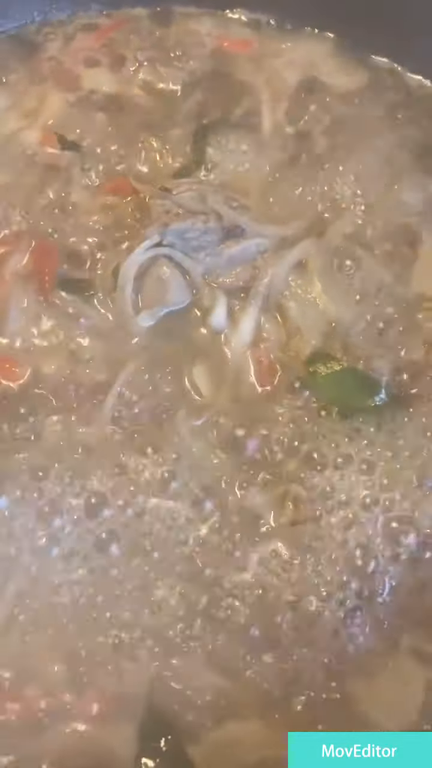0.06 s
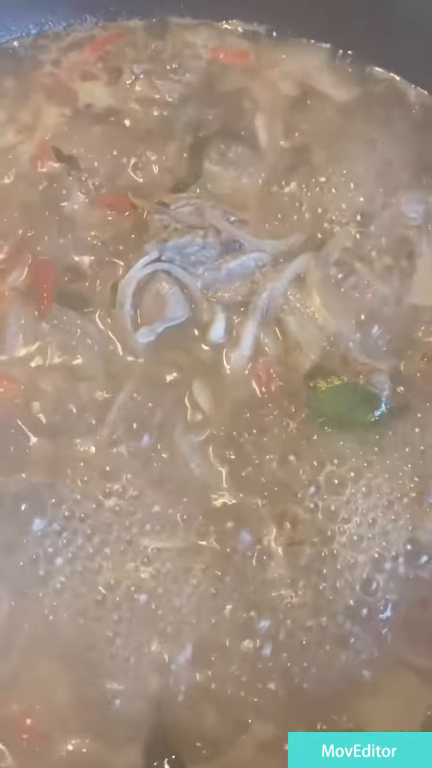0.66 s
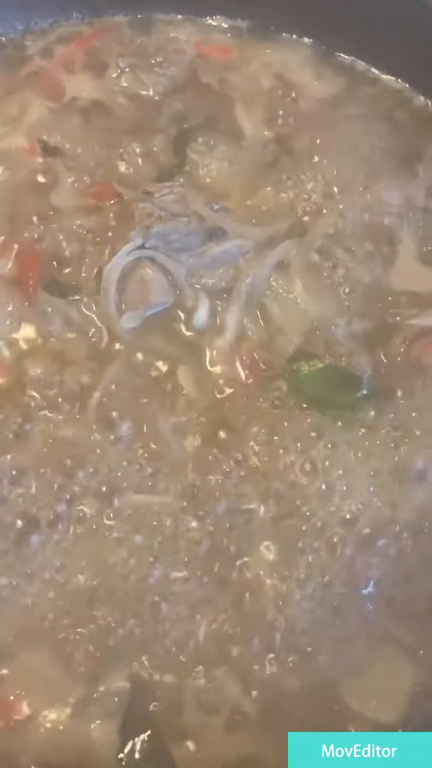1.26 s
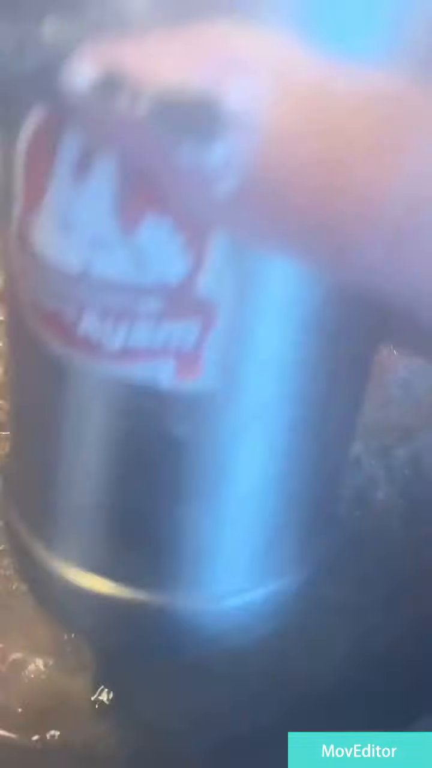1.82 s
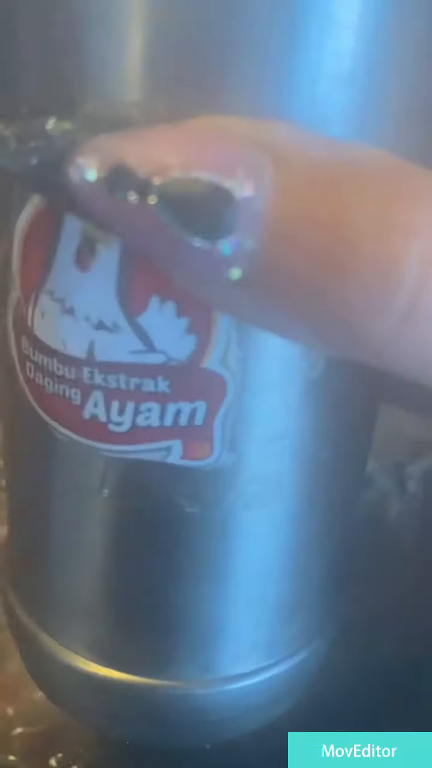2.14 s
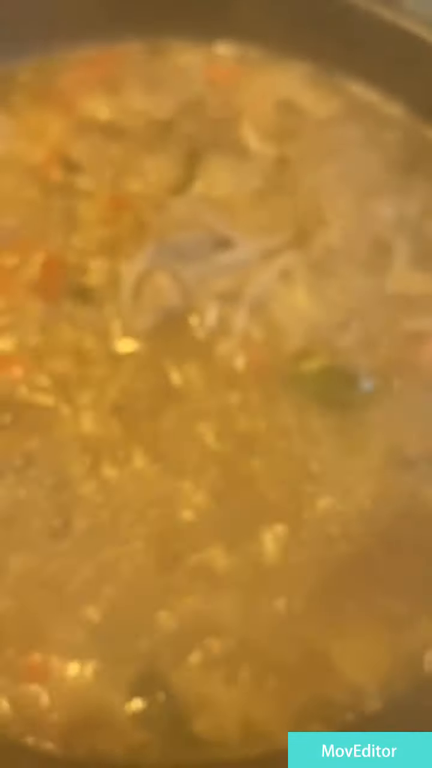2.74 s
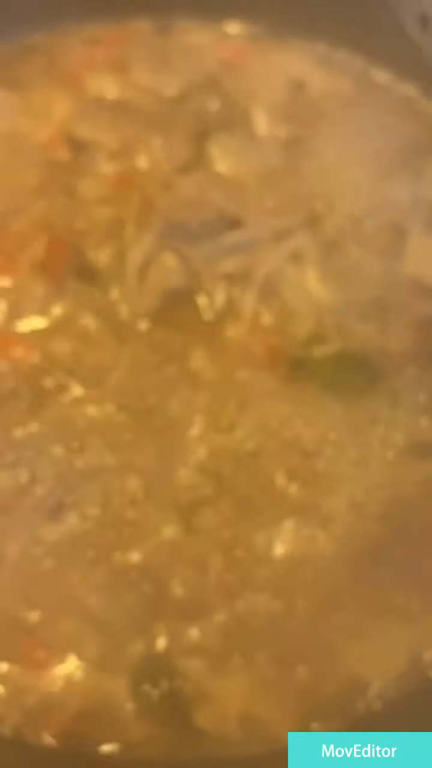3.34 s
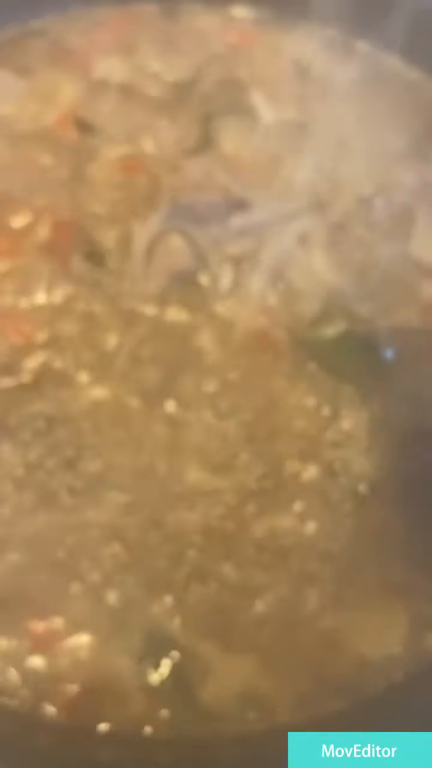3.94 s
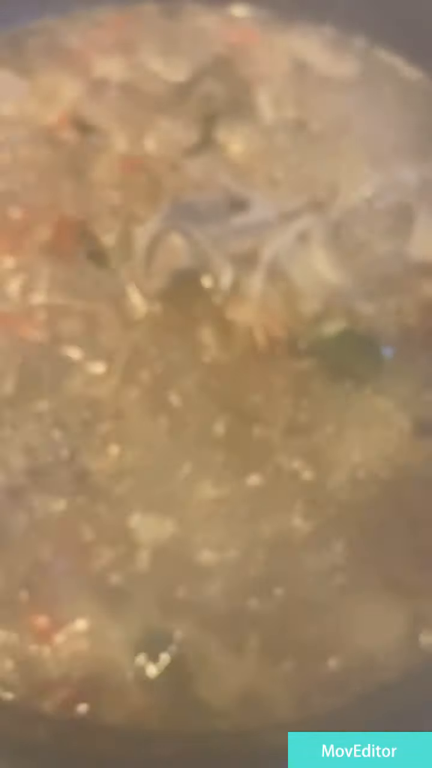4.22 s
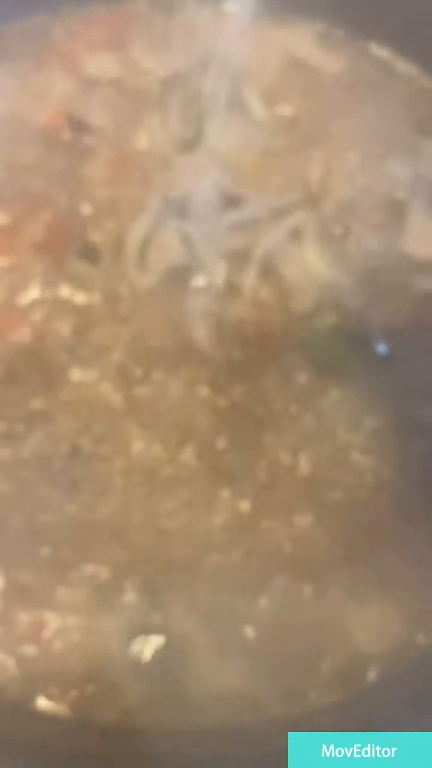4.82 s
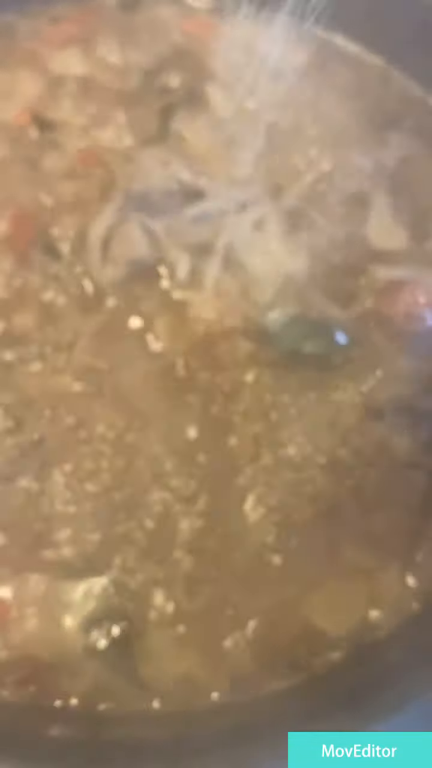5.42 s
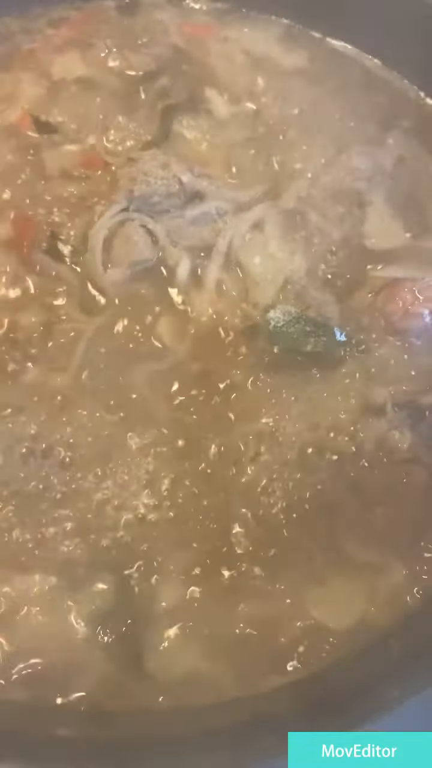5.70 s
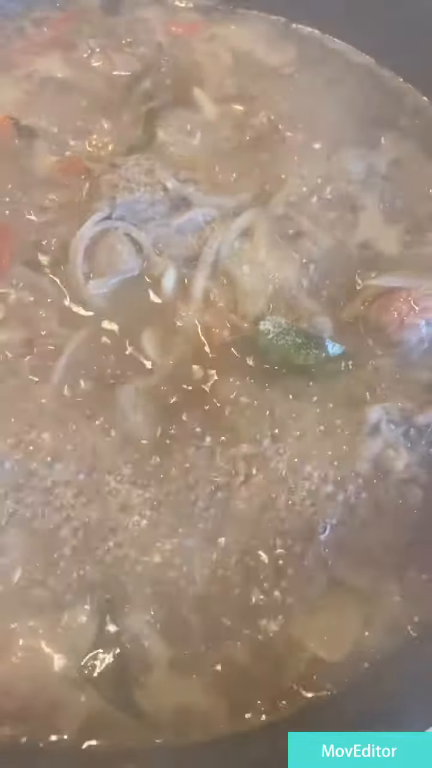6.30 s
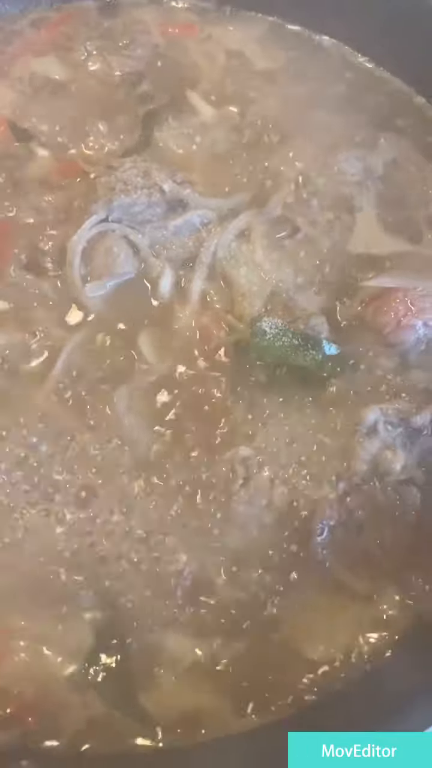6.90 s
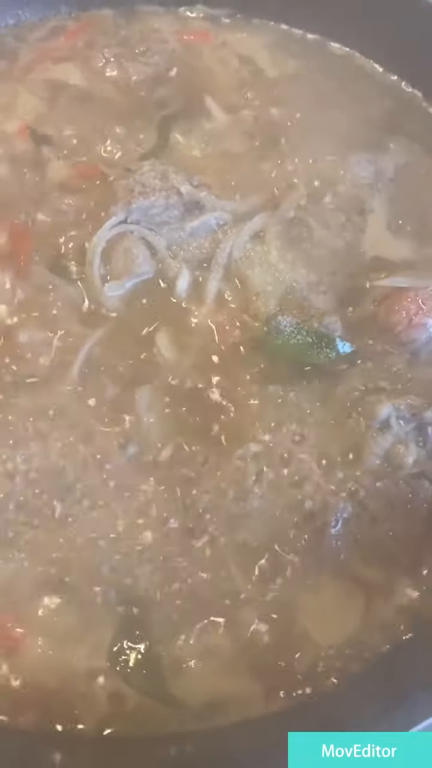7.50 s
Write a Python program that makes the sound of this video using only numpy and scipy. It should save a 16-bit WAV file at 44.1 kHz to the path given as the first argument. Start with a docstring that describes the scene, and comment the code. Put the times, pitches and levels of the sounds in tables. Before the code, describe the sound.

Close to a pan in a small kitchen, thick stew bubbles steadily with a deep churning rumble, small dry pops and fizzing foam, the pan wall ringing faintly. Around the middle, seasoning lands with two short, soft hisses. Then a plastic utensil knocks loudly on the pan once, slightly to the right, and clicks and taps lightly several times over the continuing boil.

```python
"""A thick stew boils hard in a pan, close up. Vapour heaves under the food and shakes the pan into a
rumble; bubbles crackle and pop on top and ring its wall; fine foam fizzes, hissing up twice as
seasoning falls in. Late on, a plastic utensil knocks once, hard, then clicks and taps lightly
against the pan. A small kitchen answers the pops and the utensil."""
import sys
import numpy as np
from scipy import signal
from scipy.fft import rfft, irfft, next_fast_len
from scipy.io import wavfile
from scipy.ndimage import uniform_filter1d, map_coordinates

SR = 44100
rng = np.random.default_rng(int(sys.argv[2]) if len(sys.argv) > 2 else 0)


def wav_record(signal):
    """Record a signal, one row per channel, as 16-bit PCM in the file named by sys.argv[1]."""
    frames = np.transpose(np.atleast_2d(signal))
    bounded = np.clip(frames, -1, 1)
    # unit amplitude maps onto the largest positive 16-bit level
    quanta = np.round(bounded * 32767).astype(np.int16)
    wavfile.write(sys.argv[1], SR, quanta)


N = 337806

# activity on top of the stew: time_s, crackle_db, fizz_db
SURFACE_LEVELS = [(0.0, -48, -57.5), (1.3, -48.5, -58.5), (2.1, -49, -61), (3.0, -49, -59),
                  (3.67, -48.5, -57.5), (3.95, -48.5, -58.5), (6.01, -49.5, -58), (6.47, -48, -57.5),
                  (7.19, -48.5, -56), (7.66, -49.5, -58)]
# tone of the foam, mid and side: freq_hz, level_db
FOAM_MID = [(2000, -25), (4000, -5), (4800, -9), (5400, 0), (7000, -2), (10000, -4.5), (11500, -10),
            (12600, -32), (16000, -50)]
FOAM_SIDE = [(2000, -25), (4000, -3), (4900, -2), (5700, -15), (7500, -2.5), (10000, -1.5), (13300, -0.5),
             (15000, 8), (15800, 6)]


def rumble():
    """The deep boil: vapour drives the filled pan into heaves, a churn and a low hum."""
    # resonances of the filled pan: pitch_hz, width_hz, level_db
    churn_modes = [(125, 14, -0.5), (153.3, 23, 1.5), (268.7, 12.6, 4), (283, 22.2, 10), (308, 24, 1),
                   (345, 14, -8.5), (425, 34, -5), (493.6, 22, -5.5)]
    hum_modes = [(182.4, 25, -9), (191.3, 8.2, 1.5), (205.8, 9.3, -17.5)]
    # their level rides: time_s, level_db
    churn_ride = [(0, -34), (.65, -35), (1.35, -34), (1.9, -35.5), (2.95, -36), (3.2, -35.5), (4.0, -35.5),
                  (4.4, -34), (5.8, -36.5), (6.0, -32), (6.2, -36.5), (6.6, -33.5), (7.66, -35)]
    hum_ride = [(0, -31), (.35, -37.5), (.5, -31.5), (.85, -32.5), (1.12, -38.5), (1.47, -33.5),
                (1.87, -35.5), (2.3, -36), (2.55, -40), (2.72, -36.5), (2.95, -37.5), (3.22, -31),
                (3.5, -35), (3.88, -34.5), (4.0, -40), (4.75, -37.5), (4.88, -37), (5.45, -34), (6.15, -38),
                (6.55, -30.5), (6.72, -36), (7.0, -33.5), (7.66, -36.5)]
    churn_db, = curves(churn_ride)
    hum_db, = curves(hum_ride)
    swell = heaves()
    churn = amp(churn_db) * flicker(rate_hz=12, depth_db=1.5)
    churn *= seethe(churn_modes, low_hz=102, high_hz=388, steady_s=0.12)
    hum = amp(hum_db) * flicker(rate_hz=11, depth_db=1.93)
    hum *= seethe(hum_modes, low_hz=146, high_hz=206, steady_s=0.061)
    lean_left = amp([[.4], [-.4]])
    return band(swell + hum + (churn + gulps()) * lean_left, low_hz=35, high_hz=5000)


def heaves():
    """Vapour lifts the food: the pan's lowest modes swell and sink."""
    # deepest resonances of the filled pan: pitch_hz, width_hz, level_db
    deep_modes = [(61, 8, -27), (87.3, 9.5, -5), (120, 12, -21)]
    # the big lifts: crest_s, length_s, rise_db
    lifts = [(0.127, 0.16, 7.5), (0.383, 0.14, 3.5), (0.613, 0.078, 6.5), (1.067, 0.24, 7),
             (1.5, 0.13, 3.5), (1.896, 0.086, 5), (2.257, 0.11, 5), (2.454, 0.12, 7), (2.555, 0.084, 8),
             (2.756, 0.1, 4.5), (3.244, 0.25, 7), (4.137, 0.14, 5.5), (4.632, 0.072, 8), (4.93, 0.092, 6),
             (5.7, 0.063, 5), (6.77, 0.16, 5), (7.084, 0.38, 4)]
    t, resting_db = np.arange(N) / SR, -34
    rise_db = sum(db * np.cos(np.pi * np.clip((t - s) / length, -.5, .5)) for s, length, db in lifts)
    gain = amp(resting_db + rise_db) * flicker(rate_hz=20, depth_db=0.5)
    return gain * seethe(deep_modes, low_hz=51.7, high_hz=166, steady_s=0.093)


def gulps():
    """Big pockets of vapour let go, each a short damped tone."""
    # vapour pockets: start_s, level_db, pitch_hz, t60_s
    pockets = [(0.0975, -15.5, 714, 0.013), (0.098, -22.5, 505, 0.042), (0.099, -7.5, 390, 0.013),
               (0.12, -13, 132, 0.062), (3.059, -15.5, 262, 0.03), (3.317, -17.5, 267, 0.066),
               (3.593, -32, 440, 0.11), (4.277, -32, 430, 0.055), (7.175, -27.5, 437, .05)]
    out, t = np.zeros(N), np.arange(SR // 5) / SR
    for s, db, hz, t60 in pockets:
        add(out, s, amp(db - 60 * t / t60) * np.sin(2 * np.pi * hz * t) * attack(t, 0.0017))
    return out


def pops():
    """A bubble's skin bursts with a soft, dry snap; the thick stew damps its cavity within a cycle."""
    # the largest bubbles: start_s, level_db, pitch_hz
    largest = [(0.094, -24, 2300), (0.182, -32, 1900), (0.38, -31, 2300), (0.387, -32, 2000),
               (0.3945, -23, 1700), (0.605, -24, 1050), (1.0595, -33.5, 6100), (1.2035, -30.5, 1600),
               (1.262, -26, 950), (1.2965, -29, 1400), (1.3045, -29, 1700), (2.4885, -29.5, 1900),
               (2.6955, -28, 2160), (2.87, -29.5, 1920), (2.9992, -30.5, 1100), (3.33, -31, 1100),
               (3.5335, -31.5, 1450), (3.575, -30, 2120), (4.2995, -31, 1000), (4.355, -34, 900),
               (4.7315, -32.5, 900), (4.7485, -31, 1700), (4.9555, -30, 2090), (5.2215, -31.5, 1400),
               (5.263, -30.5, 1200), (5.792, -29.5, 2100)]
    lesser_per_s, lesser_db, lesser_hz = 22, -35, 1450
    ring_cycles, snap_s = .6, .002
    out, t = np.zeros((2, N)), np.arange(SR // 30) / SR
    lesser = [(when * N / SR, lesser_db + 4 * (size - .5), lesser_hz * 2 ** (1.6 * (pitch - .5)))
              for when, size, pitch in rng.random((int(lesser_per_s * N / SR), 3))]
    for s, db, hz in largest + lesser:
        ring = np.sin(2 * np.pi * hz * t) * np.exp(-t * hz / ring_cycles)
        snap = unit(band(rng.standard_normal(len(t)), hz * .5, hz * 1.5)) * np.exp(-t / snap_s)
        muffle = signal.butter(3, [hz * .45, hz * 1.45], "bandpass", fs=SR, output="sos")
        pop = signal.sosfilt(muffle, ring + 0.2 * snap)
        place = ears(0.65, rng.uniform(-0.25, 0.25, size=1))
        add(out, s, amp(db) * pop / np.abs(pop).max() * place)
    return out + amp(-13.0) * kitchen(out)


def crackle():
    """Small bubbles crackle on the stew and set the pan wall ringing thinly."""
    # tone of the crackle, mid and side: freq_hz, level_db
    mid_tone = [(250, -16), (500, 6), (800, 2.5), (1300, 1), (1800, 1), (2300, -1.5), (2600, -3),
                (3800, -6.5), (4700, -17.5), (6000, -30), (12000, -70)]
    side_tone = [(60, -33), (150, -29), (230, 11), (275, 11.5), (330, 5), (750, 6.5), (1200, -6),
                 (1700, -27), (2200, -28), (2600, -1), (3300, -7.5), (4400, -20), (6000, -14), (12000, -78)]
    # resonances of the pan wall: pitch_hz, width_hz, level_db
    wall_modes = [(703, 13, 3.5), (791.6, 14, 10), (900, 44, 2.5), (1188, 64, 5), (1430, 80, -1.5),
                  (2003, 55, 2.5), (2860, 52, -0.5), (3265, 25, 3), (3544, 67, -3.5), (3716, 27, 1)]
    level_db, _ = curves(SURFACE_LEVELS)
    mid, side = bursts(per_s=1000, pitch_hz=1990, cycles=0.72, spread_db=2.5, wash=1.92)
    bubbles = unit(ears(coloured(mid, mid_tone), coloured(side, side_tone)))
    bubbles *= flicker(rate_hz=37, depth_db=0.9)
    drive = ears(mid + rng.standard_normal(N), 0.85 * side)
    wall = unit(band(resonate(drive, wall_modes), low_hz=500, high_hz=5460))
    return amp(level_db + 0.58) * bubbles + amp(level_db - 7.0) * wall


def wall_song():
    """The boil makes the pan wall sing at its strongest ring."""
    # the singing resonances: pitch_hz, width_hz, level_db
    modes = [(2098, 32, -7), (2171, 18, 3)]
    # their level ride: time_s, level_db
    ride = [(0, -66), (.6, -61), (.8, -58), (1.15, -61), (1.35, -56), (1.7, -60.5), (2.5, -61.5),
            (3.3, -57), (4.0, -58), (4.5, -61.5), (4.95, -56.5), (5.4, -59.5), (6.1, -58.5), (7.66, -60)]
    level_db, = curves(ride)
    song = seethe(modes, low_hz=1710, high_hz=2700, steady_s=0.054)
    return amp(level_db) * song * flicker(rate_hz=20, depth_db=0.5)


def fizz():
    """Fine foam bursts in small, bright flurries."""
    _, level_db = curves(SURFACE_LEVELS)
    mid, side = bursts(per_s=1200, pitch_hz=6220, cycles=1.7, spread_db=2.5, wash=1.05)
    mid *= flicker(rate_hz=41, depth_db=1.63)
    return amp(level_db + 11.0) * unit(ears(coloured(mid, FOAM_MID), coloured(side, FOAM_SIDE)))


def seasoning():
    """Falling powder makes the foam hiss up for a moment."""
    # shakes of powder landing: centre_s, length_s, level_db
    shakes = [(3.7, 0.11, -45), (5.546, 0.25, -45.5)]
    out = np.zeros((2, N))
    for s, length, db in shakes:
        swell = np.sqrt(np.hanning(int(length * SR)))
        mid, side = rng.standard_normal((2, len(swell)))
        hiss = unit(ears(coloured(mid, FOAM_MID), 0.79 * coloured(side, FOAM_SIDE)))
        add(out, s - length / 2, amp(db) * hiss * swell)
    return out


def knock():
    """The utensil lands hard and chatters: a damped, hollow knock from the right."""
    # the blow and its rebounds: start_s, level_db
    contacts = [(6.2655, 2), (6.2732, -6.5), (6.2826, -6.5)]
    # the hollow body of the knock: pitch_hz, level_db, t60_s
    body_modes = [(256, -10.5, 0.16), (325, 1, 0.058), (380, 1, 0.027), (471.5, 1, 0.063), (591, -4.5, 0.1),
                  (658, -8, 0.06), (709, -8, 0.09), (795, -12, 0.18), (861, -12.5, 0.17), (923, -11.5, 0.2),
                  (1115, -9, 0.036), (1240, -27, 0.1), (1430, -33, 0.07)]
    # tone of the dull thud and of the opening crack: freq_hz, level_db
    thud_tone = [(60, -27), (150, -2), (275, -3.5), (450, -5), (620, 2), (790, 0), (950, 4.5), (1120, 5),
                 (1450, -5.5), (2100, -11.5), (3300, -26), (5850, -31), (10500, -55), (14000, -94)]
    crack_tone = [(500, -10), (1200, 7), (2200, 10.5), (2600, 5), (3200, -8), (4300, -4), (6200, -5.5),
                  (10000, -10), (12000, -25), (14000, -48)]
    out, t = np.zeros((2, N)), np.arange(SR // 3) / SR
    # a bending wave crosses the pan in travel_s at at_hz; lower pitches arrive later
    travel_s, at_hz = 0.0011, 1020
    blow = impact_pulse(thud_tone, size=len(t))
    thud = filtered(blow, lambda f: np.exp(-2j * np.pi * 2 * travel_s * np.sqrt(f * at_hz)))
    for s, db in contacts:
        # neighbouring modes swing in opposite directions
        ring = sum((-1) ** k * amp(level + rng.normal(0, 0.38) - 60 * t / t60)
                   * np.sin(2 * np.pi * hz * t) for k, (hz, level, t60) in enumerate(body_modes))
        rattle = unit(coloured(wide_noise(len(t)), thud_tone)) * amp(-60 * t / 0.12)
        tail = (amp(-9) * ring + amp(-16) * rattle) * attack(t, .0007)
        add(out, s, amp(db) * (amp(-2) * thud + tail))
    crack = unit(coloured(rng.standard_normal((2, len(t))), crack_tone)) * amp(-60 * t / 0.017)
    add(out, contacts[0][0] + travel_s / 2, amp(-15.5) * crack)
    # the left ear hears it a little later and duller
    delay_s = np.array([[.00022], [0]])
    out = filtered(out, lambda f: np.exp(-2j * np.pi * f * delay_s))
    out[0] = coloured(out[0], [(700, 1), (1150, -0.5), (2400, -1.5)])
    return out + amp(-16.5) * kitchen(out)


def clicks():
    """Light taps: a bright plastic tick, a short clack and a rim ring coloured by the spot touched."""
    # utensil taps: start_s, tick_db, clack_db, ring_db, contact_t60_s, spot_hz
    taps = [(6.439, -32, -19.5, -24.5, 0.076, 2300), (6.832, -39, -44, -36.5, 0.19, 2700),
            (6.886, -42, -60, -61, .03, 3600), (7.143, -40.5, -54, -48, 0.091, 3600),
            (7.158, -40, -42, -47, 0.097, 3600), (7.234, -41, -45, -39.5, 0.092, 1500)]
    # tone of the tick and of the clack: freq_hz, level_db
    tick_tone = [(1000, -5), (2200, 9.5), (3300, 4), (4300, 8.5), (6200, 12.5), (9000, 0), (12000, -9),
                 (14000, -29), (16000, -32)]
    clack_tone = [(200, -23), (330, 14), (450, 11), (620, 10.5), (900, 9.5), (1100, 5), (1400, 8),
                  (1750, -8), (2200, 3), (2700, -25), (5000, -60)]
    # ring of the rim: pitch_hz, level_db, t60_s
    rim_modes = [(687, 4, 0.14), (1020, -10, 0.07), (1174, -17, 0.13), (1439, 5, 0.091), (1540, -6, 0.08),
                 (1770, -14, 0.16), (2140, 2, 0.085), (2266, -5, 0.11), (2920, -18, 0.23),
                 (3070, -2, 0.062), (3300, -8, .07), (3314, -6, 0.14), (4780, -26, 0.07)]
    spot_octaves = 0.79  # how far around spot_hz a tap excites the rim
    out, t = np.zeros((2, N)), np.arange(SR // 4) / SR
    for s, tick_db, clack_db, ring_db, contact_t60, spot_hz in taps:
        rattle = wide_noise(len(t))
        tick = amp(tick_db) * unit(coloured(rattle, tick_tone)) * attack(t, 0.0003)
        clack = amp(clack_db) * unit(coloured(rattle, clack_tone)) * attack(t, 0.00093)
        contact = (tick + clack) * amp(-60 * t / contact_t60)
        ring = 0
        for hz, db, t60 in rim_modes:
            share = 1 / (1 + (np.log2(hz / spot_hz) / spot_octaves) ** 2)
            phase = rng.random() + 0.42 * rng.random((2, 1))
            ring += share * amp(db - 60 * t / t60) * np.sin(2 * np.pi * (hz * t + phase))
        add(out, s, contact + amp(ring_db) * ring * attack(t, 0.0028))
    return out + amp(-10.0) * kitchen(out)


def kitchen(x):
    """Diffuse answer of the small room; each frequency dies at its own speed."""
    # room decay: freq_hz, t60_s
    decay = [(150, 0.34), (900, 0.47), (2500, 0.22), (10000, 0.13)]
    hz, t, noise = signal.stft(rng.standard_normal((2, SR // 2)), SR, nperseg=256)
    _, tail = signal.istft(noise * amp(-60 * t / along(decay, hz)[:, None]), SR, nperseg=256)
    tail = np.pad(tail / np.linalg.norm(tail[0]), ((0, 0), (SR // 200, 0)))  # 5 ms pre-delay
    return signal.fftconvolve(x, ears(tail[0], 0.31 * tail[1]), axes=1)[:, :N]


def seethe(modes, low_hz, high_hz, steady_s):
    """Countless vapour collapses shake the pan's modes with a steady flow of energy."""
    x = band(resonate(rng.standard_normal(N), modes), low_hz, high_hz)
    power = np.abs(uniform_filter1d(x * x, max(int(steady_s * SR), 1)))
    return unit(x / np.sqrt(power + power.mean() / 20))


def bursts(per_s, pitch_hz, cycles, spread_db, wash):
    """Mid and side of tiny bubbles, each a damped sine; the smallest merge into a wash of noise."""
    when, pitch, bulk, place = np.hsplit(rng.random((int(per_s * N / SR), 4)), 4)
    hz = pitch_hz * 2 ** (3 * (pitch - .5))
    gain = amp(spread_db * np.minimum(-np.log(1 - bulk), 5))
    k = np.arange(160)
    turns = hz * k / SR
    grains = gain * np.sin(2 * np.pi * turns) * np.exp(-turns / cycles)
    at = ((when * N).astype(int) + k).ravel()
    pair = np.array([np.bincount(at, (grains * g).ravel(), N)[:N] for g in (1, 2 * place - 1)])
    # whitened, so that the pan alone sets the tone
    f, power = signal.welch(pair[0], SR, nperseg=256, detrend=False)
    white = filtered(pair, lambda h: np.interp(h, f, power + power.max() / 10 ** 4) ** -.5)
    return [unit(x) + wash * rng.standard_normal(N) for x in white]


def impact_pulse(spectrum, size):
    """The minimum-phase pulse of peak 1 with a given tone."""
    cepstrum = irfft(np.log(amp(along(spectrum, np.fft.rfftfreq(size, 1 / SR)))), size)
    pulse = irfft(np.exp(rfft(cepstrum * 2 * (np.arange(size) < size // 2))), size)
    return pulse / np.abs(pulse).max()


def flicker(rate_hz, depth_db):
    """A smooth random gain."""
    knots = rng.standard_normal(int(N * rate_hz / SR) + 4)
    return amp(depth_db * map_coordinates(knots, [np.arange(N) * rate_hz / SR]))


def attack(t, rise_s):
    """An onset that eases up to 1."""
    return 1 - np.exp(-t / rise_s)


def wide_noise(size):
    """White noise, partly shared by both ears."""
    return ears(*rng.standard_normal((2, size)) * [[1], [.6]])


def amp(db):
    """Decibels to gain."""
    return 10 ** (np.asarray(db) / 20)


def unit(x):
    """Scale to rms 1."""
    return x / np.sqrt(np.mean(x ** 2) + 1e-20)


def along(points, hz):
    """(freq_hz, value) points read on a log axis."""
    f, v = np.transpose(points)
    return np.interp(np.log(hz + 1), np.log(f + 1), v)


def curves(rows):
    """One value per sample for each column after the time."""
    s, *cols = np.transpose(rows)
    return [np.interp(np.arange(N) / SR, s, c) for c in cols]


def filtered(x, response):
    """x through a frequency response."""
    n = x.shape[-1]
    m = next_fast_len(n + 8192)
    return irfft(rfft(x, m) * response(np.fft.rfftfreq(m, 1 / SR)), m)[..., :n]


def coloured(x, spectrum):
    """x equalised by (freq_hz, level_db) points."""
    return filtered(x, lambda f: amp(along(spectrum, f)))


def resonate(x, modes):
    """x through a bank of (pitch_hz, width_hz, level_db) resonances."""
    return filtered(x, lambda f: sum(amp(db) * 1j * f * width / (hz * hz - f * f + 1j * f * width)
                                     for hz, width, db in modes))


def band(x, low_hz, high_hz):
    """Steep band-pass."""
    return filtered(x, lambda f: 1 / np.sqrt((1 + (low_hz / (f + 1)) ** 8) * (1 + (f / high_hz) ** 8)))


def ears(mid, side):
    """Left and right from mid and side."""
    return np.array([mid + side, mid - side])


def add(track, s, sound):
    """Mix a sound into a track at time s."""
    start = max(round(s * SR), 0)
    part = track[..., start:start + sound.shape[-1]]
    part += sound[..., :part.shape[-1]]


def scene():
    """The boiling pan, the seasoning and the utensil."""
    boil = rumble() + crackle() + wall_song() + fizz() + pops()
    return boil + seasoning() + knock() + clicks()


def record(dry):
    """Round off the highest peaks and cut the very top of the treble."""
    ceiling, top_hz = .95, 15850
    rounded = dry / (1 + np.abs(dry / ceiling) ** 6) ** (1 / 6)
    return filtered(rounded, lambda hz: hz < top_hz)


dry = scene()
out = record(dry)
wav_record(out)
```